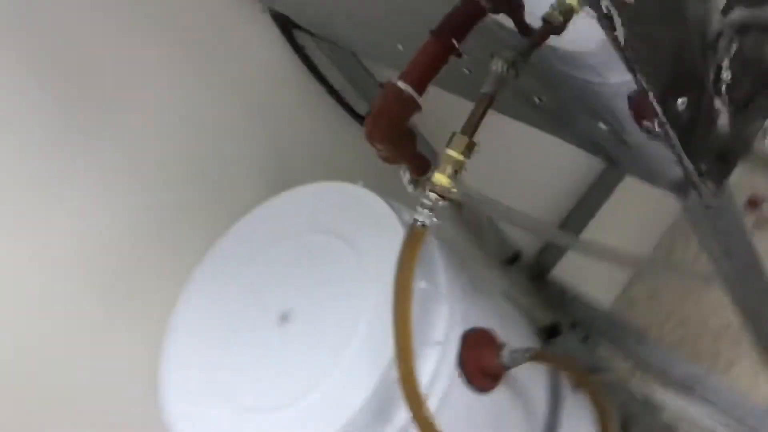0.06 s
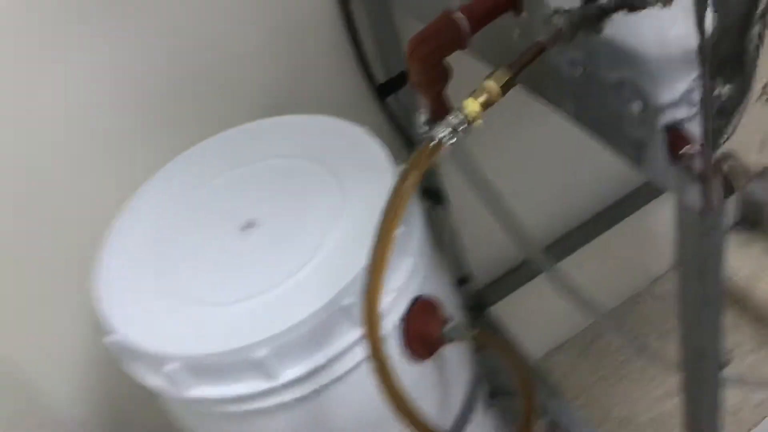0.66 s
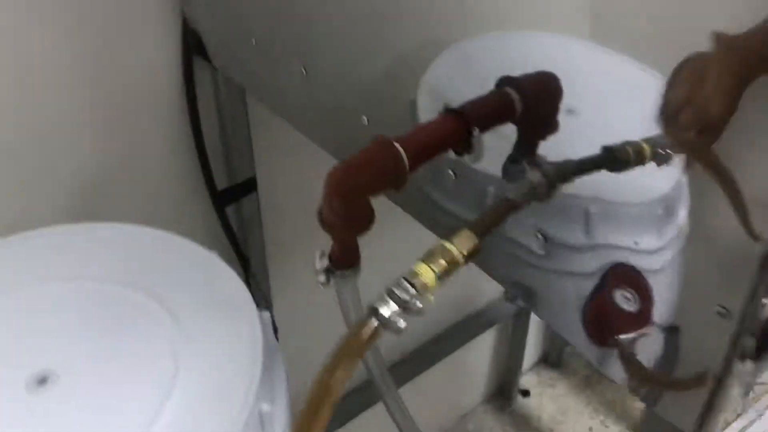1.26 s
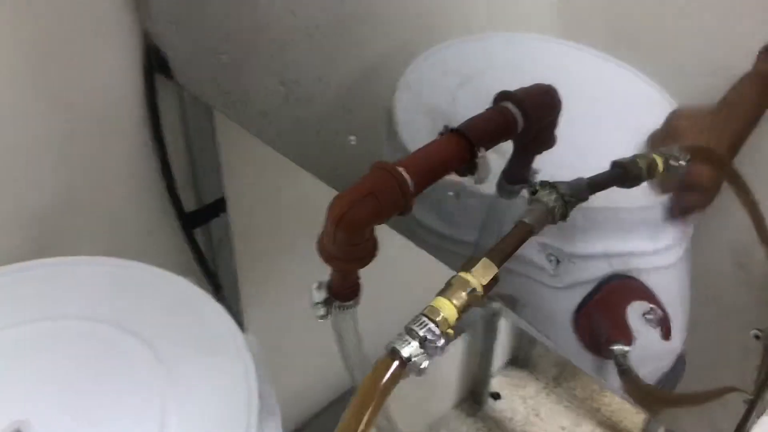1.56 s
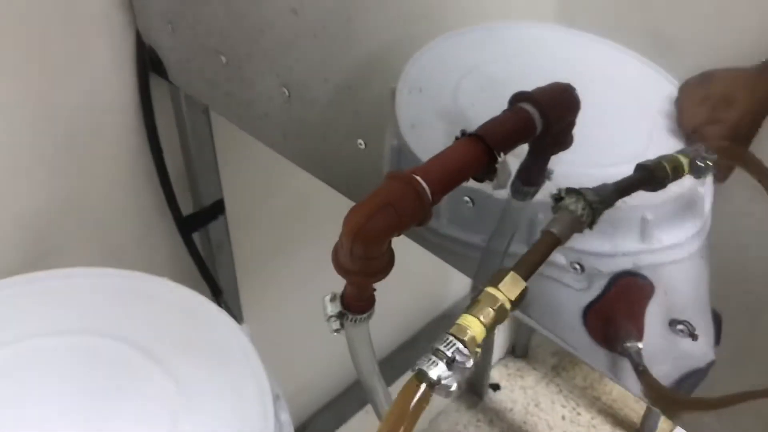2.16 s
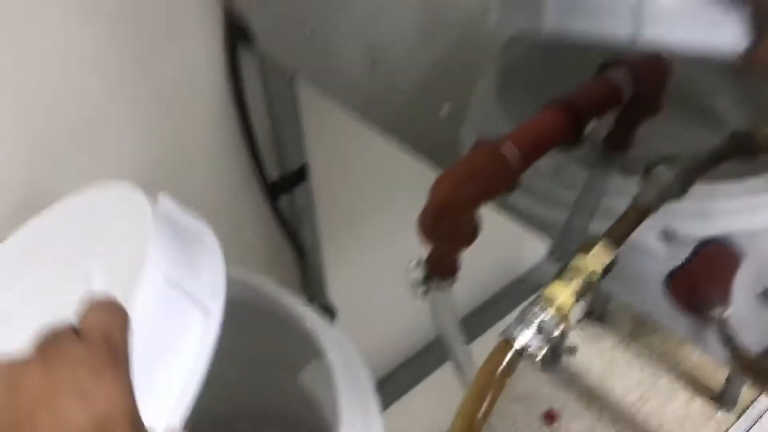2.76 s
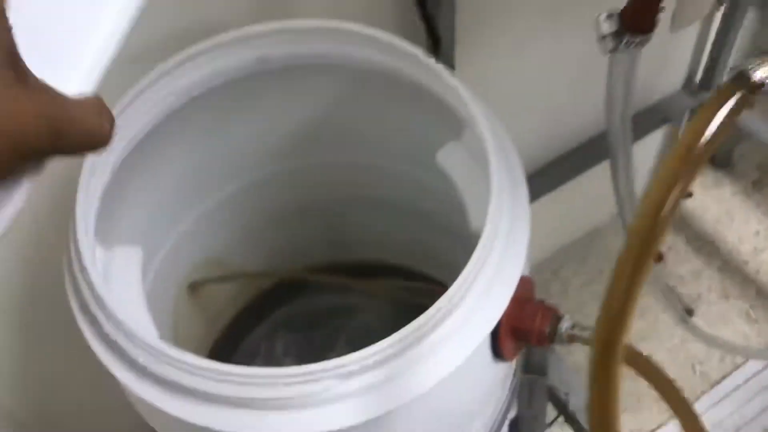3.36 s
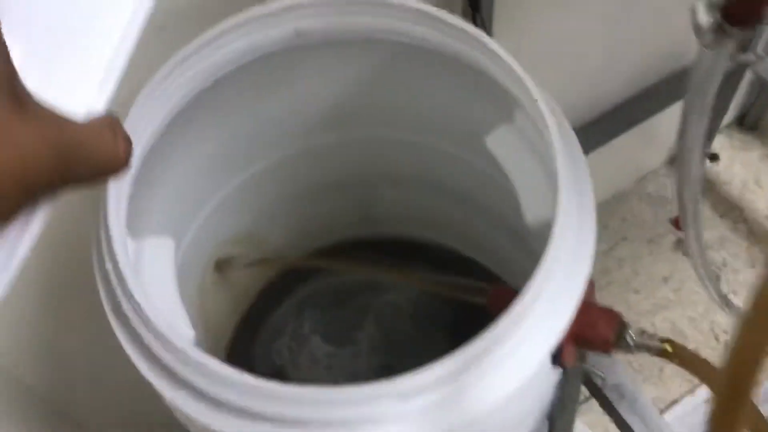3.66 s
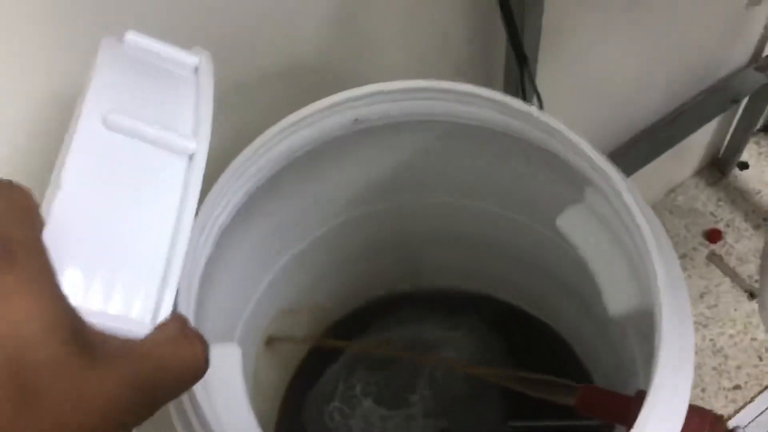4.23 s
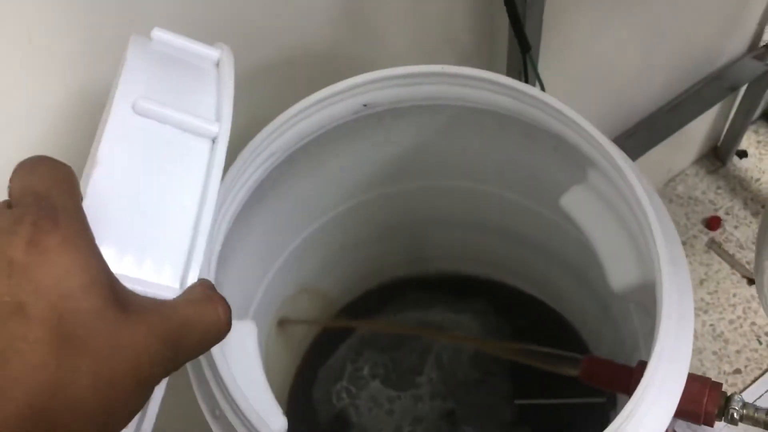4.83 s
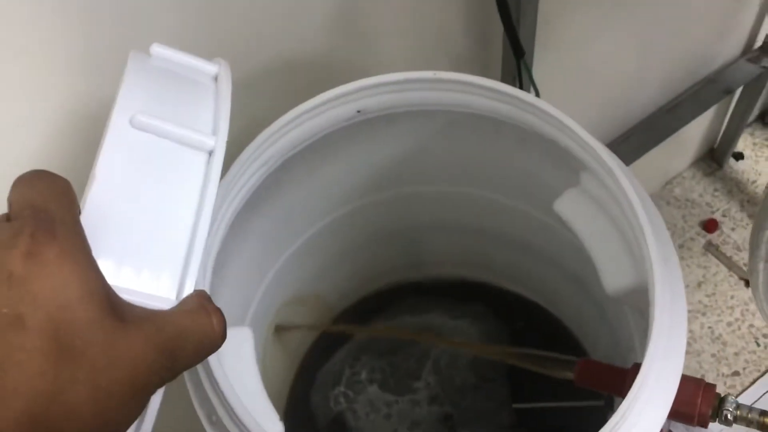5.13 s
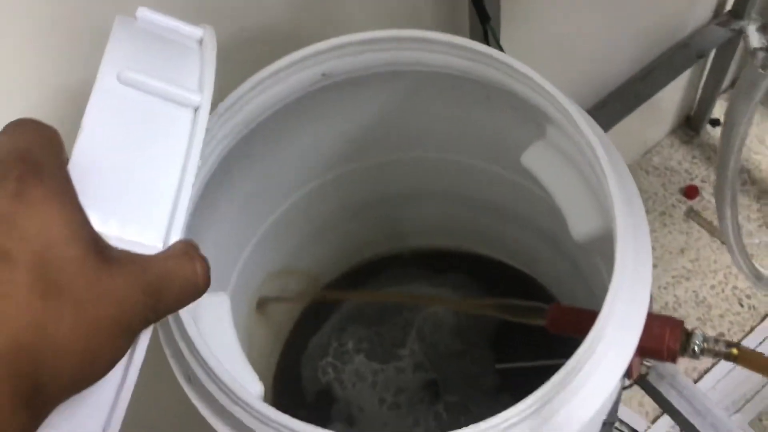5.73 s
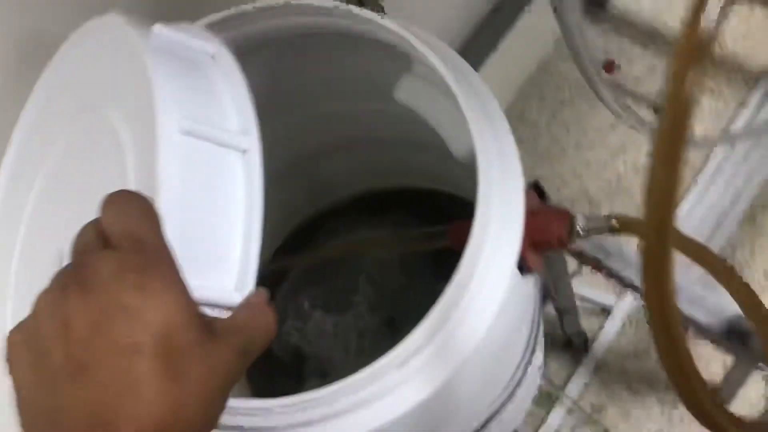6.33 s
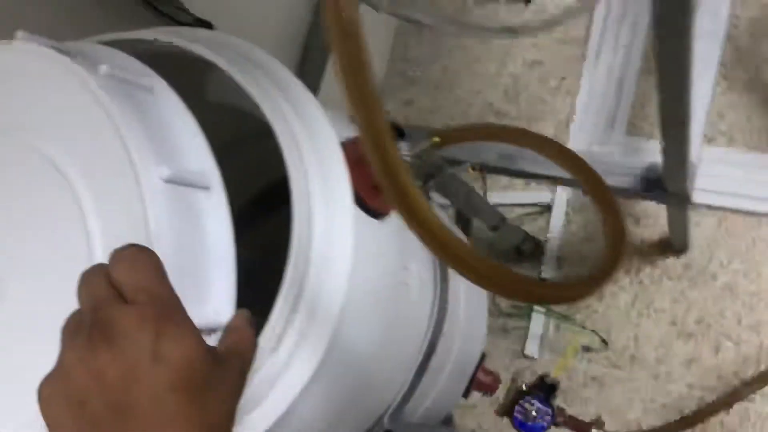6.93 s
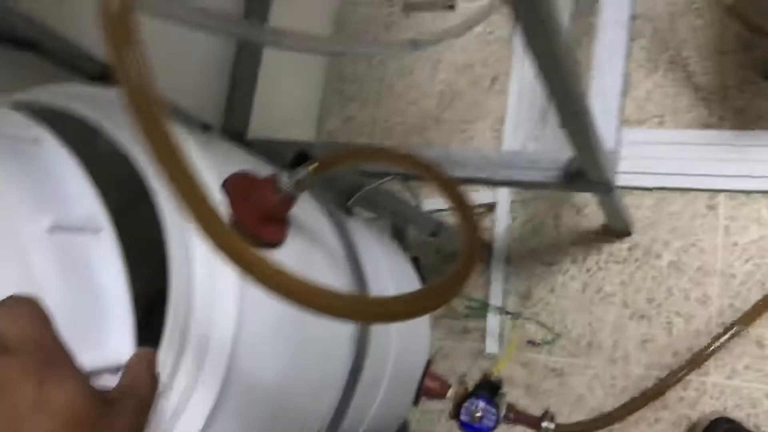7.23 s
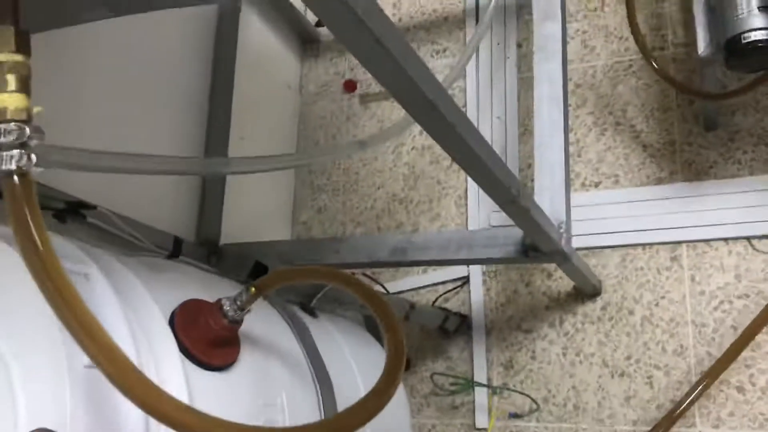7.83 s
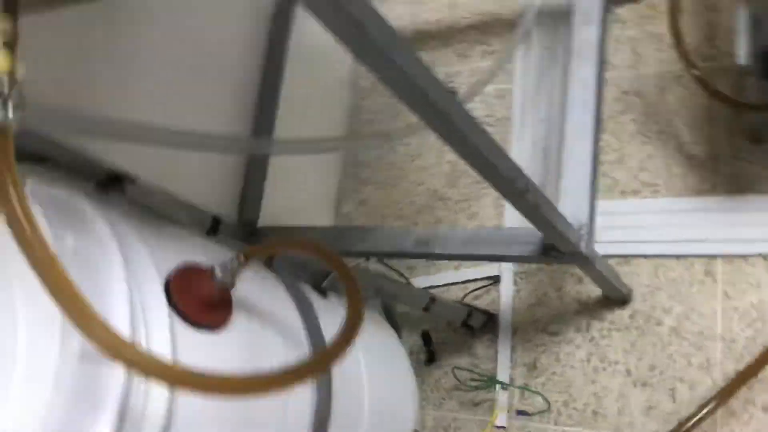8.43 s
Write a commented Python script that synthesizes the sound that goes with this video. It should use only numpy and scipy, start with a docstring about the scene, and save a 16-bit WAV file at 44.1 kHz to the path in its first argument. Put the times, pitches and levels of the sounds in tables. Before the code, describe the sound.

An electric motor hums with a thin high whine while a plastic bucket lid thumps off, liquid trickles, and the lid knocks back on.

```python
"""First you hear an electric motor humming in a small hard room, with a thin whine from its inverter
(the fast switch that feeds it power). It pumps liquid into plastic buckets. A hand pulls a lid off,
and the lid flexes over the trapped air with a hollow thump. Inside, liquid trickles, drops plink and
froth bubbles burst in tiny ticks. Then the lid scrapes and is knocked back on.
Sleeves swish close to the moving microphone."""
import sys
import numpy as np
from scipy import signal
from scipy.fft import rfft, irfft, next_fast_len
from scipy.io import wavfile

SR = 44100
rng = np.random.default_rng(int(sys.argv[2]) if len(sys.argv) > 2 else 0)


def wav_record(signal):
    """Record a signal, one row per channel, as 16-bit PCM in the file named by sys.argv[1]."""
    frames = np.transpose(np.atleast_2d(signal))
    bounded = np.clip(frames, -1, 1)
    # unit amplitude maps onto the largest positive 16-bit level
    quanta = np.round(bounded * 32767).astype(np.int16)
    wavfile.write(sys.argv[1], SR, quanta)


N = 378819

SHAFT_HZ, SWITCH_HZ = 45.7, 4000  # how fast the motor turns and the inverter switches
SOUND_M_PER_S = 343

# Levels in the tables are relative: the functions may turn a whole layer up or down.
# tones of the turning shaft: (multiple of the shaft rate, level [dB])
HUM_TONES = [(1, -47.5), (2, -35), (3, -42)]
# the tone at four times the shaft rate grows as the microphone turns to the motor: (time [s], level [dB])
FOURTH_TONE = [(0, -43.5), (1.3, -42), (3.0, -37), (5.3, -39), (6.2, -35.5), (7.2, -38.5), (8.59, -34)]
# booms of the frame and room, shaken by the motor: (pitch [Hz], width [Hz], level [dB])
FRAME_BOOMS = [(57.5, 1.46, -38), (67.5, 1.96, -36.5), (88.9, 3.7, -38), (120.5, 10, -36),
               (136.14, 3.9, -41), (150.8, 8.7, -39), (180.4, 8.2, -42), (567.6, 7.5, -57.5),
               (955.5, 9.6, -57.5)]
# boom of the motor's case: (pitch [Hz], width [Hz], level [dB])
CASE_BOOM = [(299, 14.2, -44.5)]
# rush of the cooling fan: (frequency [Hz], level [dB])
FAN_SPECTRUM = [(20, -32), (32, -24), (50, -8), (92, -13.5), (180, -9.5), (225, -13.5), (260, -17),
                (320, -18), (380, -21.5), (460, -20.5), (500, -27.5), (550, -24.5), (1100, -28.5),
                (2100, -34), (3500, -38.5), (4400, -40), (7000, -94)]
# thin hiss of the flow: (frequency [Hz], level [dB])
FLOW_SPECTRUM = [(4500, 6), (6000, 6), (8300, 7), (9300, 2.5), (10400, -5), (11800, 6), (14500, 4),
                 (15800, 2)]

# the five strong whine tones: (multiple of the switching rate, offset [shaft rates])
STRONG_WHINES = [(2, 2), (2, 0), (2, -2), (1, -1), (1, 5)]
# the loudest whine, two shaft rates above twice the switching rate: (time [s], level [dB])
MAIN_WHINE = [(0.05, -56), (0.24, -51), (0.39, -54), (0.44, -66.5), (0.52, -49), (0.59, -43), (0.73, -63),
              (1.01, -44.5), (1.13, -62), (1.5, -48), (1.64, -60), (1.73, -54), (1.91, -68), (1.99, -48.5),
              (2.17, -44), (2.49, -48.5), (2.62, -59), (2.91, -42), (3.02, -63), (3.15, -51), (3.58, -55),
              (3.75, -66), (3.84, -52), (4.11, -48.5), (4.54, -54), (4.95, -62), (5.2, -56), (5.75, -55),
              (6.1, -47.5), (6.39, -54), (6.47, -48), (6.81, -49.5), (7.08, -63), (7.16, -52), (8.17, -58),
              (8.32, -69), (8.46, -47), (8.54, -50)]
# the whine at twice the switching rate: (time [s], level [dB])
CENTRE_WHINE = [(0, -53), (0.35, -59), (0.5, -55), (0.65, -50), (0.8, -55), (1.2, -54), (1.45, -59),
                (1.68, -48), (2.55, -67), (3.08, -48.5), (3.8, -68), (4.1, -56), (4.3, -68), (4.7, -60),
                (5.2, -53), (5.82, -69), (6.05, -57), (6.4, -57), (7.35, -61), (7.78, -49.5), (8.15, -53),
                (8.3, -64), (8.59, -62)]
# the whine two shaft rates below that: (time [s], level [dB])
LOWER_WHINE = [(0, -63), (0.55, -62), (0.75, -61), (1.0, -57), (2.05, -58), (2.4, -60), (2.8, -72),
               (3.1, -52), (3.3, -67), (3.45, -53), (3.7, -56), (4.05, -61), (4.4, -80), (4.7, -66),
               (5.4, -72), (5.95, -49), (6.2, -60), (7.3, -60), (7.55, -75), (7.8, -55), (8.0, -69),
               (8.15, -58), (8.59, -68)]
# two whines beside the switching rate take turns: (time [s], lower one's level [dB], upper one's [dB])
WHINE_PAIR = [(0, -76, -68), (0.2, -72, -65), (0.4, -74, -59), (0.8, -73, -66), (1.4, -72, -65),
              (1.6, -65, -58), (2.6, -63, -67), (2.8, -65, -57.5), (3.1, -67, -56.5), (3.35, -68, -59.5),
              (3.6, -76, -63.5), (3.95, -63, -72), (4.3, -59, -76), (4.55, -59, -60.5), (5.1, -61, -65),
              (5.45, -62, -62), (5.7, -72, -60), (6.0, -68, -63), (6.4, -75, -63), (6.75, -61, -69),
              (7.15, -78, -61), (7.45, -73, -71), (7.7, -68, -64), (8.59, -61, -60)]
# weaker whine tones: (multiple of the switching rate, offset [shaft rates], level [dB])
WEAK_WHINES = [(1, -5, -69), (1, -3, -72.5), (1, 1, -69), (1, 3, -75), (1, 7, -69), (2, -16, -66.5),
               (2, -10, -77), (2, -8, -73), (2, -6, -75), (2, -4, -67), (2, 4, -70), (2, 6, -71),
               (2, 8, -59), (2, 10, -73.5), (2, 16, -66.5), (3, -5, -76), (3, -3, -69), (3, -1, -73),
               (3, 3, -74), (4, -16, -75)]

# the lid flexing like a drumhead over the trapped air: (time [s], level [dB], pitch [Hz])
LID_THUMPS = [(2.232, -12, 123), (2.5024, 4.5, 147.4), (2.642, -8.5, 155.3), (6.359, -12.5, 176),
              (6.435, -13.5, 169), (7.315, -10.5, 128), (7.401, -7.5, 137.6), (7.436, -9, 130.5),
              (7.483, -2, 138.4), (7.523, -5.5, 131.6), (7.719, -11.5, 148.7)]
# the lid hitting the rim; glancing touches lack bass, soft ones lack treble: (time [s], level [dB],
# bass cut [Hz], treble cut [Hz], snap level [dB], snap pitch [Hz], snap width [Hz], snap fade time [s])
LID_KNOCKS = [(2.236, -26, 300, 1410, -22, 880, 250, 0.065),
              (2.4995, -25.5, 200, 4000, -24, 5500, 3400, .05),
              (2.501, -21, 150, 2770, -1, 2420, 900, 0.042),
              (2.525, -31, 300, 2500, -32, 2500, 1500, 0.045),
              (2.564, -25, 700, 2000, -27, 1500, 900, 0.065),
              (2.577, -26.5, 700, 2580, -20, 1400, 900, 0.051),
              (2.642, -23, 607, 2980, -15.5, 5800, 3600, 0.042),
              (2.6423, -32, 700, 1500, -8, 2720, 900, .04),
              (6.1414, -22, 500, 1430, -2.5, 1510, 430, 0.044),
              (6.141, -38, 1000, 2500, -26, 3100, 500, .035),
              (6.212, -22.5, 800, 1500, -8, 1500, 450, 0.031), (6.251, -26, 900, 1400, -23, 1400, 450, .04),
              (6.512, -27, 800, 1700, -25, 3600, 2300, 0.061),
              (7.3948, -23.5, 596, 2360, -26, 2000, 1200, 0.06),
              (7.419, -26, 600, 2000, -27, 5000, 3000, .05), (7.436, -26, 600, 1990, -25, 3500, 2200, .06),
              (7.482, -24.5, 400, 4220, -24, 3200, 2000, .05),
              (7.486, -24.5, 300, 1880, -10, 3900, 2400, .05),
              (7.494, -20.5, 150, 800, -24, 2600, 1600, 0.097),
              (7.720, -28.5, 299, 3140, -12, 3400, 2100, .05),
              (7.7245, -25.5, 300, 2000, -20, 4950, 3000, 0.13)]
# notes at which the lid rings: (pitch [Hz], level [dB], time to fade by 60 dB [s])
LID_NOTES = [(289, 10.5, 0.076), (454, 3.5, 0.026), (660, 9, 0.0068), (866, -6, 0.067), (1116, 2.5, 0.036),
             (1340, 5, 0.015), (1563, 1, 0.014), (1820, 1, 0.015), (2140, -3.5, 0.032), (2460, 7, 0.0087),
             (3300, 7.5, 0.0045), (3900, -7, 0.013)]
# notes of the lid's edge: (pitch [Hz], width [Hz], level [dB])
EDGE_NOTES = [(2820, 450, -2), (3180, 630, -0.5), (4450, 660, -5), (5500, 1400, -9), (6600, 400, -13)]

# how near the microphone is to the open bucket: (time [s], nearness [0-1])
BUCKET_NEARNESS = [(0, 0), (2.7, 0.32), (3.4, 0.59), (4.0, 0.93), (5.8, 0.84), (6.5, 0.61), (7.1, 0.05),
                   (7.5, 0.08), (8.59, 0.15)]
# notes of the air in the open bucket: (pitch [Hz], width [Hz], level [dB])
HOLLOW_NOTES = [(86.9, 5.1, -29), (201.3, 7.9, -38), (342.5, 10.6, -46), (434.8, 15, -52)]
# notes stirred by the trickle: (pitch [Hz], width [Hz], level [dB])
TRICKLE_NOTES = [(1177, 73, -48.5), (1446, 36, -56.5)]
# the loudest froth bubbles bursting: (time [s], level [dB], pitch [Hz])
BUBBLE_TICKS = [(0.391, -33, 12800), (1.34, -38, 13000), (1.3897, -31, 12500), (2.7621, -30.5, 11800),
                (3.0231, -40, 11640), (3.053, -32, 14500), (3.1169, -31, 14500), (3.1762, -35, 12400),
                (3.4212, -33, 13700), (3.4805, -31, 12000), (3.6626, -31, 14700), (3.715, -38, 12000),
                (3.9953, -18, 14200), (4.0937, -29, 13500), (4.148, -40, 14300), (4.3635, -31, 13800),
                (4.4489, -37, 13000), (4.5466, -35, 14400), (4.5965, -33, 11900), (4.6714, -37, 13500),
                (4.8928, -34, 13500), (5.025, -25, 14200), (5.0679, -28, 14200), (5.1168, -33, 14600),
                (5.1722, -34, 10900), (5.2849, -26.5, 12700), (5.3987, -41, 13370), (5.4541, -46, 13500),
                (5.664, -28.5, 13680), (5.7509, -37, 14900), (5.8187, -40, 13500), (5.8751, -36, 13000),
                (5.9439, -30, 14300), (6.0093, -36, 13500), (6.0871, -38, 13500), (6.1655, -34, 14000),
                (6.2303, -35, 12600), (6.3071, -36, 14500), (6.5251, -30, 12600), (6.5939, -30, 11500),
                (6.6563, -33, 13800), (6.8005, -34, 13100), (6.9891, -36, 13600), (7.1487, -38, 13600)]
# drops falling into the liquid: (time [s], level [dB], pitch [Hz])
DROP_PLINKS = [(1.168, -30, 4800), (1.212, -29, 4060), (1.343, -26, 4600), (3.053, -28, 6000),
               (3.995, -16, 6400), (4.095, -22, 6840), (4.45, -26, 6250), (4.48, -32, 5400),
               (4.597, -18.5, 6030), (5.285, -32, 7000), (5.905, -17.5, 4690), (5.946, -22, 6000),
               (6.308, -31, 4700), (6.369, -26, 6840), (6.39, -25, 4200), (6.424, -23, 4930),
               (6.658, -20.5, 4630), (6.802, -18, 4770), (6.942, -32, 6400)]

# sleeve swishes: (peak time [s], rise [s], fall [s], level [dB], brightness [dB])
SLEEVE_SWISHES = [(1.564, 0.018, 0.043, -51.5, 15.5), (1.6, 0.098, 0.18, -45, -1),
                  (1.4, 0.15, 0.23, -51.5, 2), (2.315, 0.076, 0.12, -40.5, -2.5),
                  (3.74, 0.06, 0.22, -45.5, -11), (4.5, 0.25, 0.4, -52.5, 1), (8.12, 0.06, 0.29, -46, -3),
                  (8.39, 0.053, 0.12, -47.5, 4), (8.45, 0.058, 0.42, -46.5, -7)]
# hiss of sliding cloth: (frequency [Hz], level [dB])
CLOTH_SPECTRUM = [(500, 2), (1500, 7), (3500, 6.5), (5500, 0.5), (8000, 2.5), (10500, -2.5), (14000, 3.5),
                  (16000, -6)]
# fingers rubbing plastic: (peak time [s], rise [s], fall [s], level [dB], pitch [Hz], width [Hz])
FINGER_RUBS = [(3.27, 0.1, 0.19, -52.5, 2800, 1800), (3.89, 0.04, 0.09, -43.5, 1514, 70),
               (4.385, 0.007, 0.015, -43, 3240, 300), (6.35, 0.04, 0.12, -43.5, 1130, 400),
               (8.38, 0.64, 0.8, -49.5, 1380, 350)]


def motor(waver_db=-0.2, flicker_db=1.5, case_follows=0.32):
    """The shaft hums and shakes the frame and case; the fan rushes and the flow hisses."""
    fourth_db, = curves(FOURTH_TONE)
    tones = [*HUM_TONES, (4, fourth_db)]
    hum = sum(from_db(db + waver_db * drift(3.9)) * tone(k * SHAFT_HZ) for k, db in tones)
    case = from_db(case_follows * (fourth_db - fourth_db.mean())) * booms(CASE_BOOM)
    fan = from_db(-36.5) * noise(FAN_SPECTRUM)
    flow = from_db(-55.5 + flicker_db * drift(12.0)) * noise(FLOW_SPECTRUM)
    return from_db(-0.73) * (hum + booms(FRAME_BOOMS) + case) + fan + flow


def inverter(walk_m_per_s=.27, hover_m_per_s=.0317, tremor_m=.0035, hover_calm=.55):
    """Switching makes close tones that beat into a thin buzz; each wavers as the microphone moves."""
    near, = curves(BUCKET_NEARNESS)
    # the microphone nearly stops over the open bucket
    path_m = np.cumsum(walk_m_per_s + (hover_m_per_s - walk_m_per_s) * near) / SR
    main_db, = curves(MAIN_WHINE)
    main_hz = 2 * (SWITCH_HZ + SHAFT_HZ)
    strong_levels = [main_db, *curves(CENTRE_WHINE), *curves(LOWER_WHINE), *curves(WHINE_PAIR)]
    whines = []
    for (multiple, offset), db in zip(STRONG_WHINES, strong_levels):
        hz = multiple * SWITCH_HZ + offset * SHAFT_HZ
        whines.append((hz, from_db(db - 0.7) * standing_wave(hz, path_m, echo_db=-11)))
    for multiple, offset, db in WEAK_WHINES:
        hz = multiple * SWITCH_HZ + offset * SHAFT_HZ
        share = 0.15 * np.exp(-abs(hz - main_hz) / 400)  # tones near the loudest swell a little with it
        swell_db = share * (main_db - main_db.mean())
        whines.append((hz, from_db(db + swell_db) * standing_wave(hz, path_m, echo_db=2)))
    # the hand holding the microphone trembles, less so over the bucket
    shake_m = tremor_m * (1 - hover_calm * near) * drift(3.7)
    heard_s = seconds() + shake_m / SOUND_M_PER_S
    waves = (gain * np.exp(2j * np.pi * (hz * heard_s + rng.random())) for hz, gain in whines)
    return np.sqrt(2) * sum(waves).real


def standing_wave(hz, path_m, echo_db, count=6):
    """Wall echoes make loud and quiet spots: gives a tone's strength and phase along the path."""
    angle, phase = 2 * np.pi * rng.random((2, count, 1))
    cycles = np.cos(angle) * path_m[::100] * hz / SOUND_M_PER_S
    echoes = np.exp(1j * (2 * np.pi * cycles + phase)).sum(axis=0) / np.sqrt(count)
    gain = 1 + from_db(echo_db) * echoes
    gain /= np.sqrt(np.mean(np.abs(gain) ** 2))
    return np.interp(seconds(), seconds()[::100], gain)


def lid_thumps(beat_hz=17, fade_s=0.18, seated_s=7.0, overtone_ratio=2.35):
    """Lid and trapped air push on each other, so each thump swells, then stops short."""
    out, t = np.zeros(N), np.arange(SR // 2) / SR
    swell = np.sin(np.pi * beat_hz * t) * from_db(-60 * t / fade_s)
    for s, db, hz in LID_THUMPS:
        overtone_db = -17.5 if s > seated_s else -41  # rings more once pressed onto the rim
        phase = 2 * np.pi * hz * t
        note = np.sin(phase) + from_db(overtone_db) * np.sin(overtone_ratio * phase)
        add(out, s, -from_db(db) * swell * note)
    return out


def lid_knocks(body_db=-7, snap_db=11, body_longer=1.25):
    """Each knock rings the plastic and adds a snap with its own pitch and loudness."""
    force, snaps = np.zeros(N), np.zeros(N)
    for s, db, bass_hz, treble_hz, own_snap_db, hz, width, fade_s in LID_KNOCKS:
        treble_cut = signal.butter(3, treble_hz, fs=SR)
        bass_cut = signal.butter(2, bass_hz, "high", fs=SR)
        hit = signal.lfilter(*treble_cut, burst(body_longer * fade_s, -14, 0.51))
        add(force, s, from_db(db) * signal.lfilter(*bass_cut, hit))
        snap = ring(burst(fade_s, -13, 0.13), hz, width)
        snap *= np.sqrt(np.pi * width / SR) / np.linalg.norm(snap)  # wider snaps carry more energy
        add(snaps, s, from_db(own_snap_db) * snap)
    body = 0
    for hz, db, fade_s in LID_NOTES:
        width = np.log(1000) / (np.pi * fade_s)
        body += from_db(db) * ring(force, hz, width) * SR / (2 * np.pi * width)
    return from_db(body_db) * body + from_db(snap_db) * snaps


def lid_scrape(slips_per_s=2500, level_db=-43):
    """The held lid shifts against the rim: a dying run of tiny slips rings its edge."""
    slips = random_taps(slips_per_s)
    edge = sum(from_db(db) * rms_one(ring_twice(slips, hz, width)) for hz, width, db in EDGE_NOTES)
    return from_db(level_db) * stroke(peak_s=5.639, rise_s=0.0053, fall_s=0.17) * edge


def open_bucket(splashes_per_s=500):
    """The hollow booms along with the motor, and small splashes ring its higher notes."""
    near, = curves(BUCKET_NEARNESS)
    splashes = random_taps(splashes_per_s)
    trickle = sum(from_db(db) * rms_one(ring(splashes, hz, width)) for hz, width, db in TRICKLE_NOTES)
    return near * (booms(HOLLOW_NOTES) + trickle)


def froth_and_drops(tick_db=19, drop_db=12.5, fizz_db=-33.5, small_bubbles=650):
    """Bubbles burst and drops plink; a fizz of small bubbles is louder near the opening."""
    out, pops = np.zeros(N), np.zeros(N)
    for s, db, hz in BUBBLE_TICKS:
        add(out, s, from_db(db + tick_db) * ring_twice(burst(.006, -12, .08), hz, width=5500))
    for s, db, hz in DROP_PLINKS:
        add(out, s, from_db(db + drop_db) * ring(burst(.032, -1, .13), hz, width=1600))
    for when, chance in rng.random((small_bubbles, 2)):
        db = fizz_db - 5 * np.log(chance + .01)  # many quiet pops, a few loud ones
        add(pops, when * N / SR, from_db(db) * burst(.004, -18, .05))
    near, = curves(BUCKET_NEARNESS)
    return out + (0.27 + near) * ring_twice(pops, hz=13500, width=4500)


def sleeves_and_fingers(grain_db=1.9, bright_hz=8000):
    """Sleeves swish, some dull and some bright, and fingers rub; both have a fine uneven grain."""
    cloth = noise(CLOTH_SPECTRUM)
    dull = signal.sosfilt(signal.butter(1, bright_hz, fs=SR, output="sos"), cloth)
    out = np.zeros(N)
    for s, rise, fall, db, bright_db in SLEEVE_SWISHES:
        out += from_db(db) * stroke(s, rise, fall) * (dull + from_db(bright_db) * (cloth - dull))
    friction = rng.standard_normal(N)
    for s, rise, fall, db, hz, width in FINGER_RUBS:
        out += from_db(db) * stroke(s, rise, fall) * rms_one(ring_twice(friction, hz, width))
    return out * from_db(grain_db * drift(45))


def booms(notes):
    """Notes kept ringing by random, swirling flow."""
    out = np.zeros(N)
    for hz, width, db in notes:
        swirl = rng.standard_normal(N + SR // 2)  # starts early, so the note is already ringing
        out += from_db(db) * rms_one(ring_twice(swirl, hz, 2 * width)[-N:])
    return out


def burst(fade_s, echo_db, echo_fade_s):
    """A crack and the room's scattered echoes; each drops 60 dB in its fade time."""
    t = np.arange(int(echo_fade_s * SR)) / SR
    fade = from_db(-60 * t / fade_s) + from_db(echo_db - 60 * t / echo_fade_s)
    crack = rng.standard_normal(len(t)) * fade
    return crack / np.linalg.norm(crack)


def stroke(peak_s, rise_s, fall_s):
    """Loudness of a slide that speeds up, then dies away."""
    t = seconds() - peak_s
    return np.exp(-np.where(t < 0, (t / rise_s) ** 2, t / fall_s))


def ring(x, hz, width):
    """Let a sound ring at one pitch; a smaller width [Hz] rings longer."""
    r = np.exp(-np.pi * width / SR)
    feed = np.array([1, 0, -1]) * (1 - r * r) / 2
    feedback = [1, -2 * r * np.cos(2 * np.pi * hz / SR), r * r]
    return signal.lfilter(feed, feedback, x + 1e-18)


def ring_twice(x, hz, width):
    """Two passes leave less sound far from the pitch."""
    return ring(ring(x, hz, width), hz, width)


def tone(hz):
    """A pure tone of average power 1."""
    return np.sqrt(2) * np.sin(2 * np.pi * (hz * seconds() + rng.random()))


def noise(spectrum):
    """Steady noise with the given balance of lows and highs."""
    hz, db = np.transpose(spectrum)
    size = next_fast_len(N)
    bins = np.maximum(np.fft.rfftfreq(size, 1 / SR), 1)
    gain = from_db(np.interp(np.log(bins), np.log(hz), db, left=-90, right=-90))
    return rms_one(irfft(rfft(rng.standard_normal(size)) * gain, size)[:N])


def random_taps(per_s):
    """Tiny pushes of random time and size."""
    return (rng.random(N) < per_s / SR) * rng.standard_normal(N)


def drift(rate_hz):
    """A smooth random wobble, about 1 in size."""
    r = np.exp(-200 * np.pi * rate_hz / SR)
    steps = rng.standard_normal(N // 100 + 2002)  # one per 100 samples, plus a run-up
    slow = signal.lfilter([1], [1, -2 * r, r * r], steps)[2000:]
    return np.interp(np.arange(N) / 100, np.arange(len(slow)), rms_one(slow))


def curves(rows):
    """Join timed rows by straight lines, one curve per value column."""
    s, *columns = np.transpose(rows)
    return [np.interp(seconds(), s, column) for column in columns]


def add(out, s, sound):
    """Mix a short sound in at time s."""
    at = max(round(s * SR), 0)
    out[at:at + len(sound)] += sound[:N - at]


def from_db(db):
    """Turn decibels into a volume factor."""
    return 10 ** (np.asarray(db) / 20)


def rms_one(x):
    """Scale to an average power of 1."""
    return x / np.sqrt(np.mean(x ** 2) + 1e-20)


def seconds():
    """Time of every sample."""
    return np.arange(N) / SR


def scene():
    """All the sounds meet at one microphone."""
    machine = motor() + inverter()
    liquid = open_bucket() + froth_and_drops()
    lid = lid_knocks() + lid_thumps() + lid_scrape()
    return (machine + liquid + lid + sleeves_and_fingers())[None]


def record(dry):
    """The highest treble, above 15850 Hz, is cut steeply."""
    return signal.sosfilt(signal.ellip(12, .1, 80, 15850, fs=SR, output="sos"), dry)


dry = scene()
out = record(dry)
wav_record(out)
```